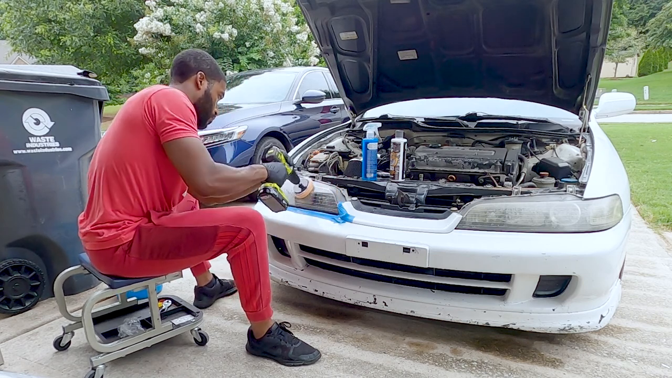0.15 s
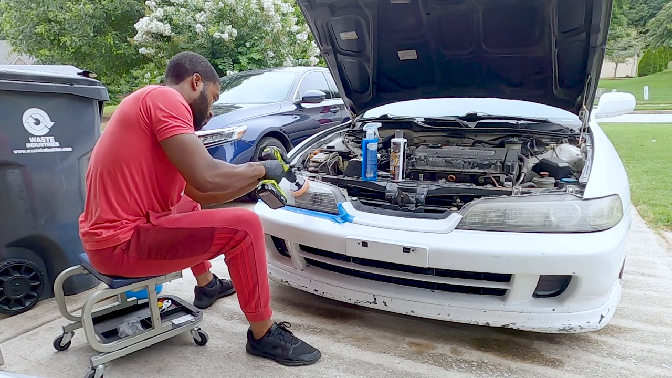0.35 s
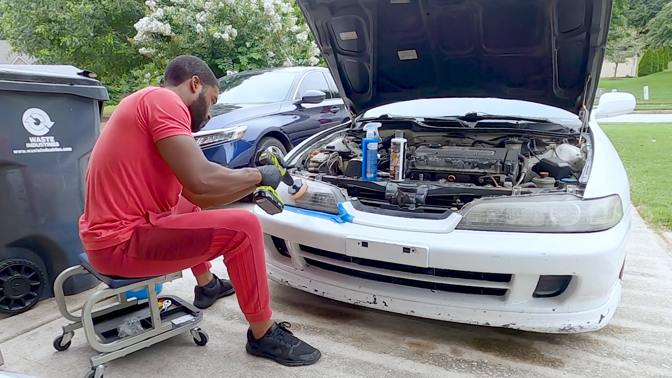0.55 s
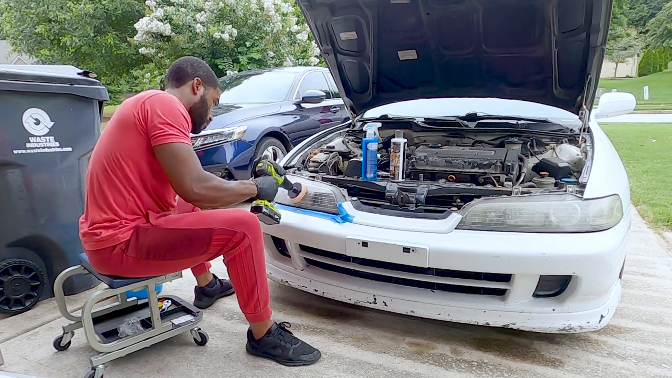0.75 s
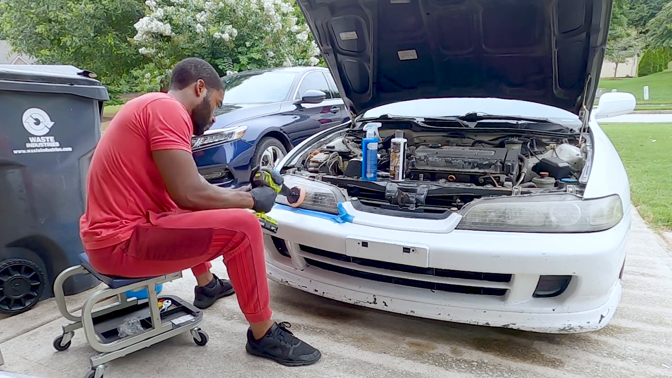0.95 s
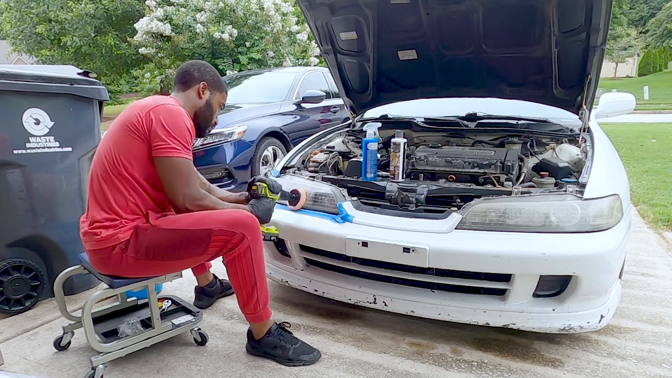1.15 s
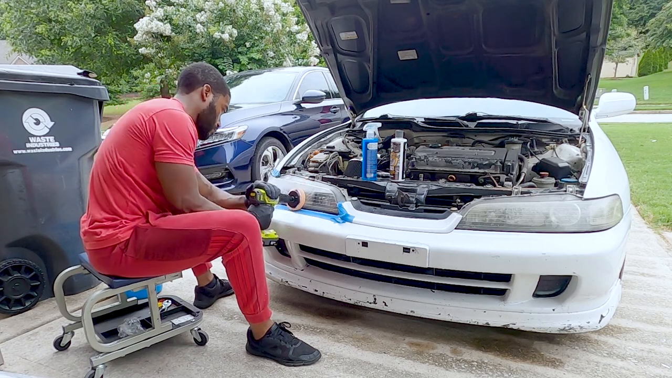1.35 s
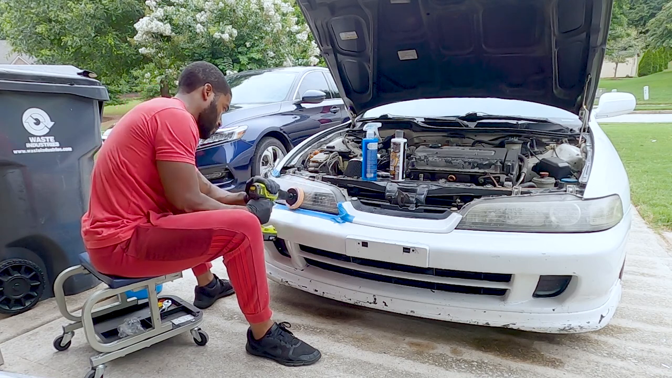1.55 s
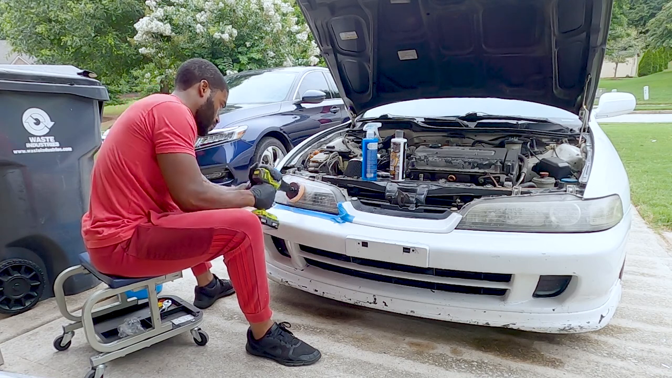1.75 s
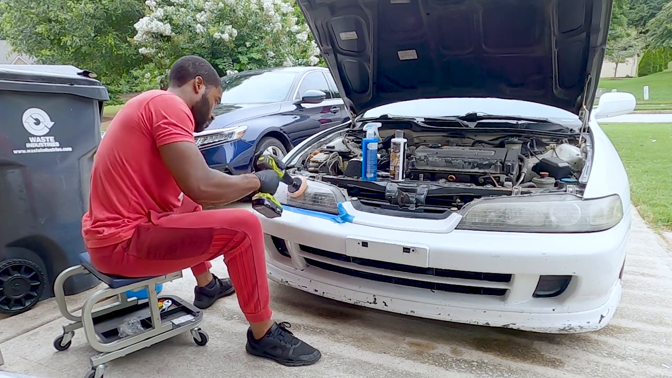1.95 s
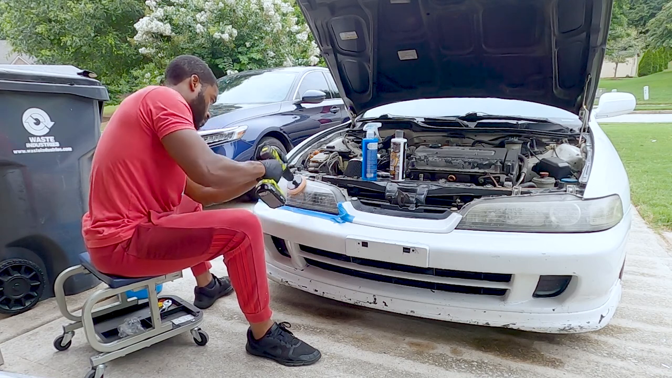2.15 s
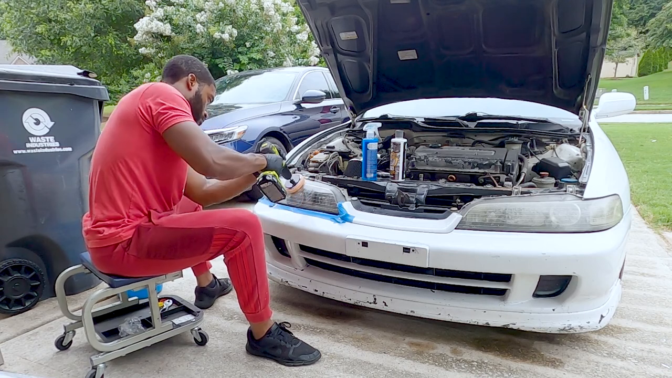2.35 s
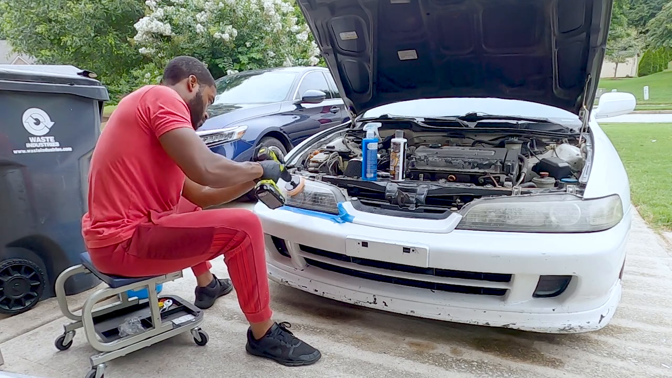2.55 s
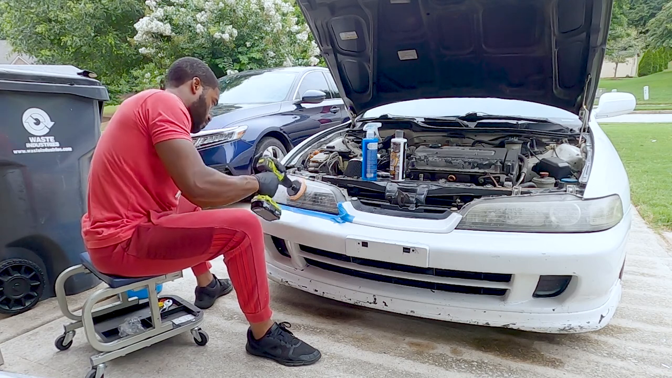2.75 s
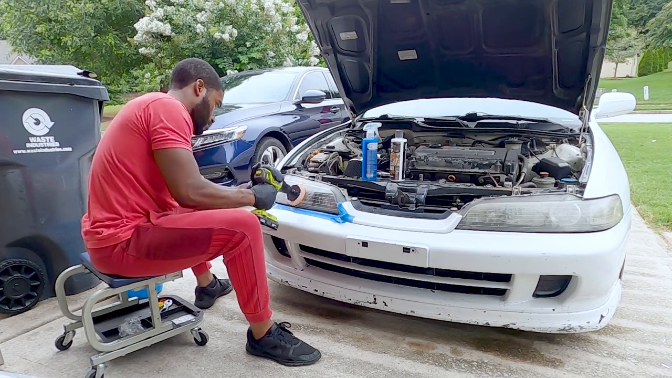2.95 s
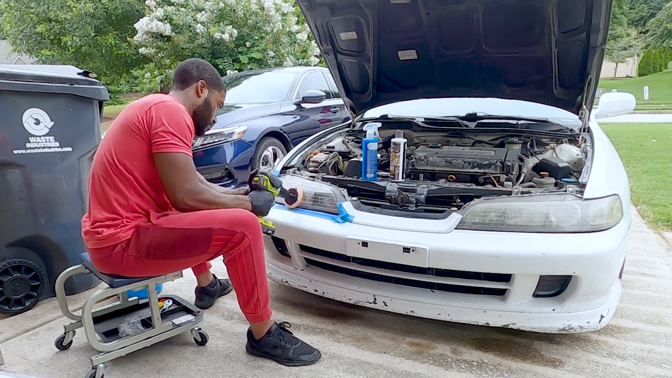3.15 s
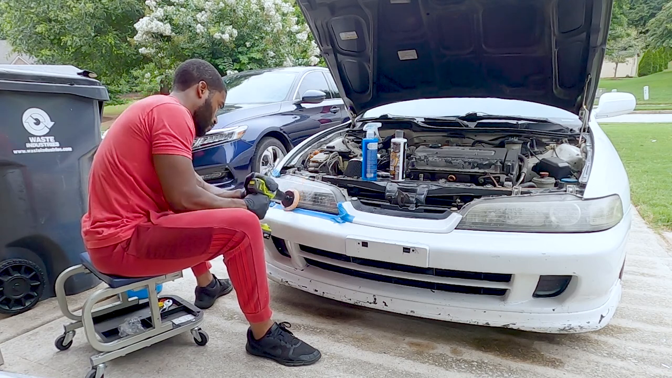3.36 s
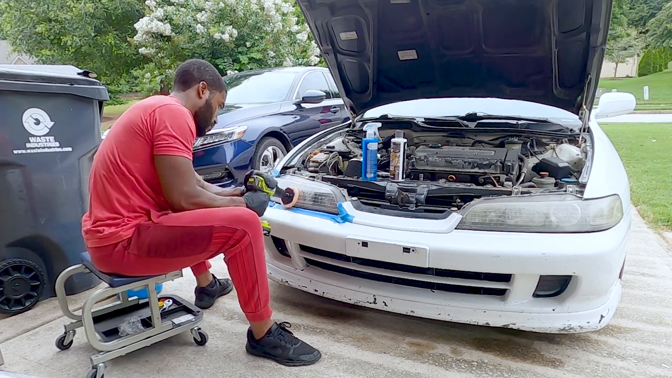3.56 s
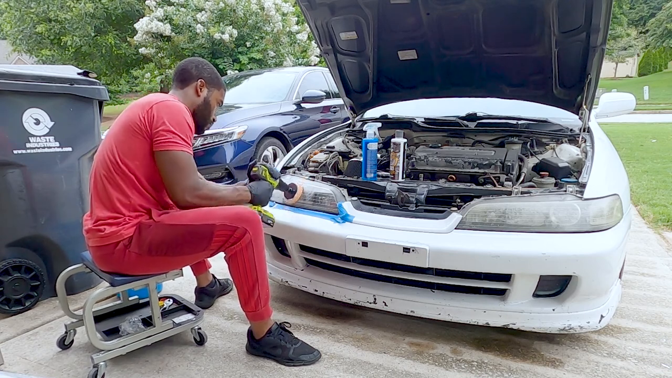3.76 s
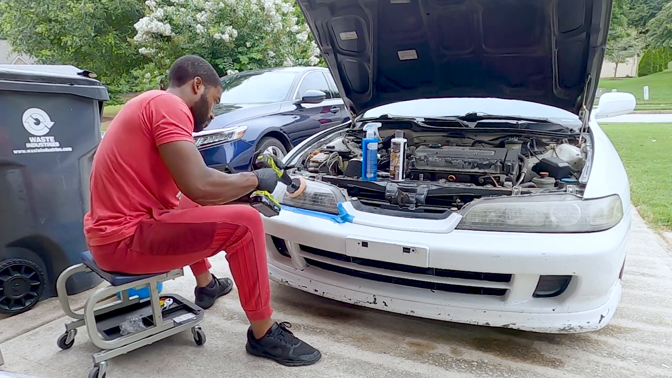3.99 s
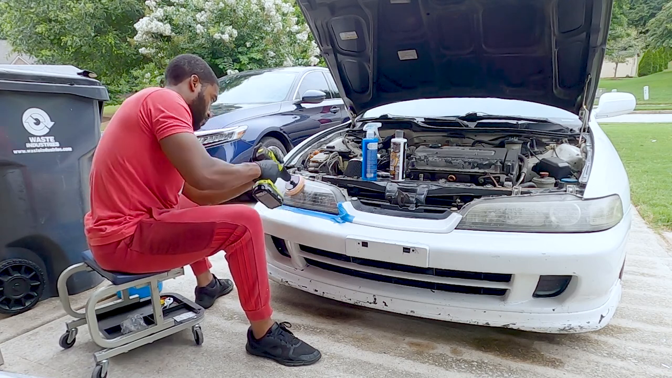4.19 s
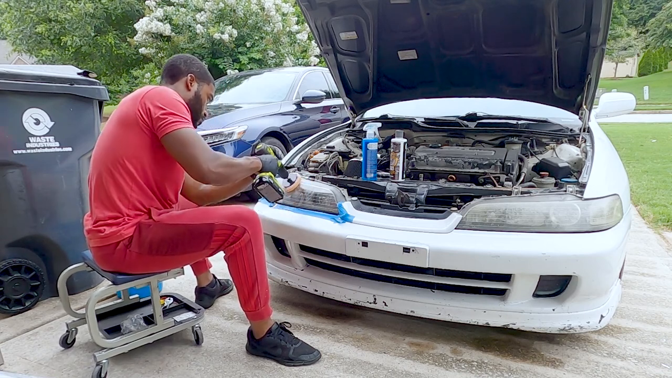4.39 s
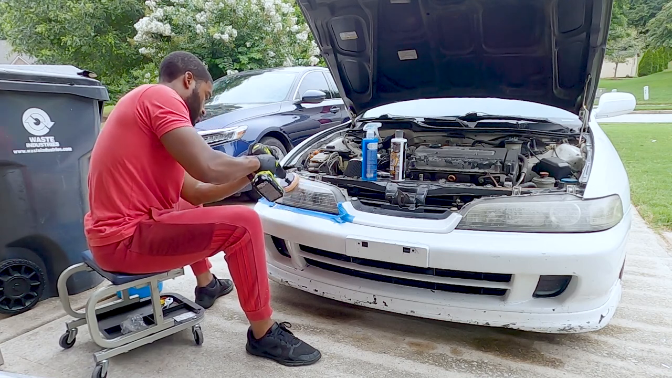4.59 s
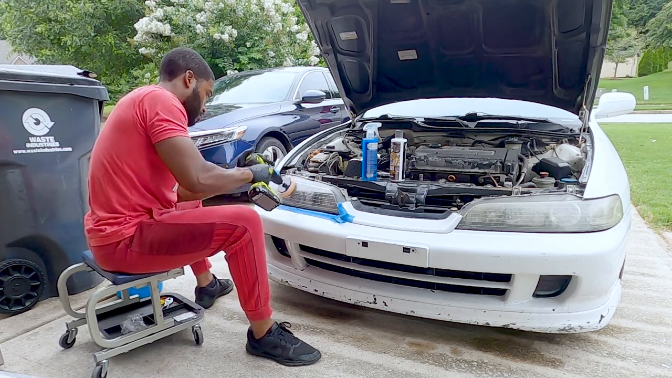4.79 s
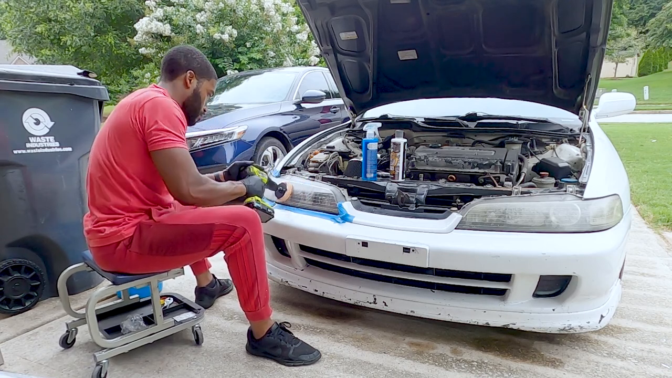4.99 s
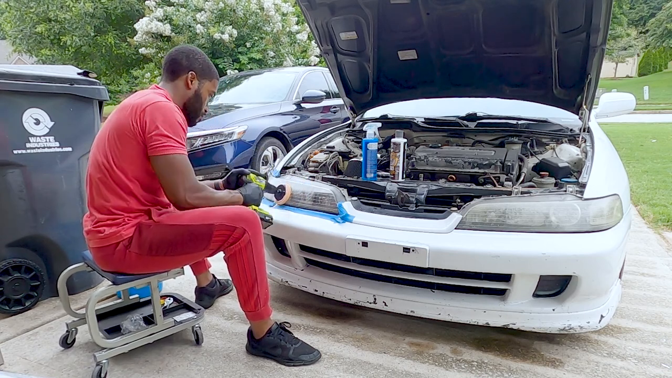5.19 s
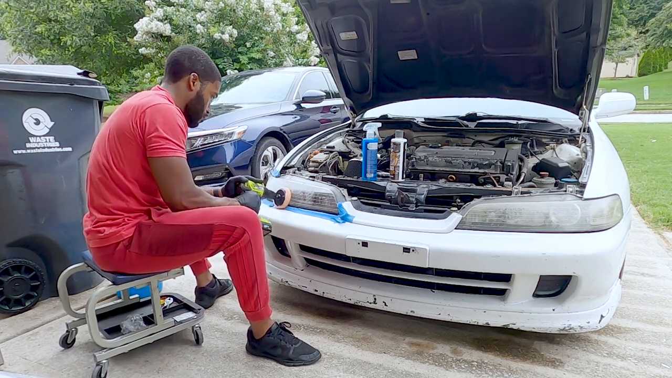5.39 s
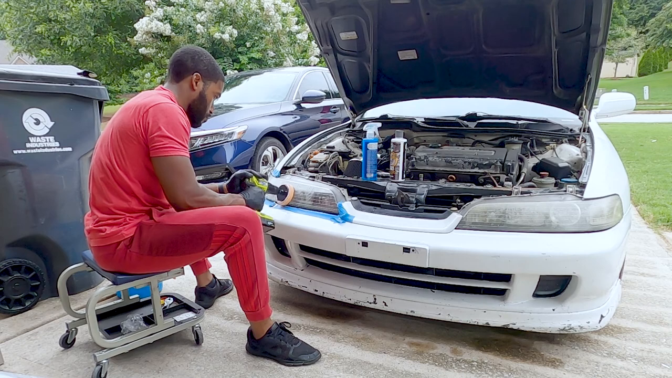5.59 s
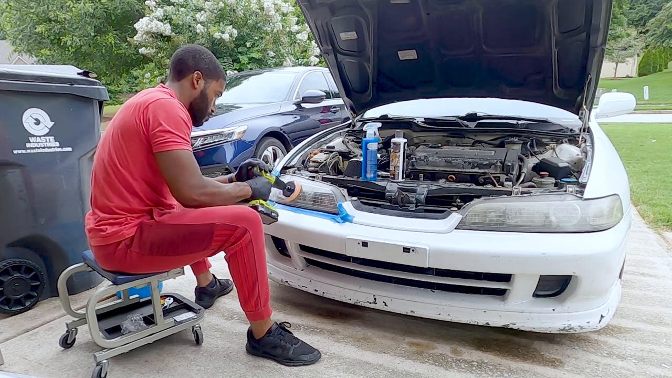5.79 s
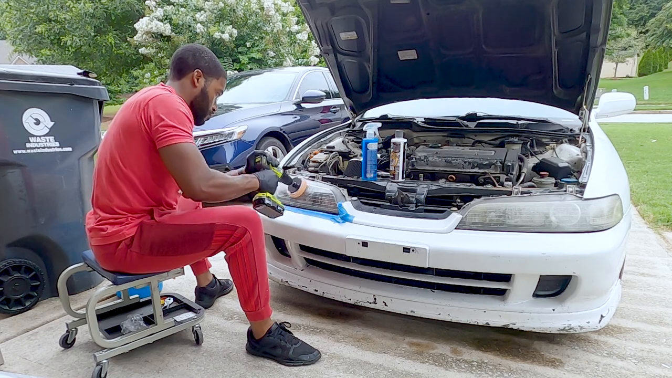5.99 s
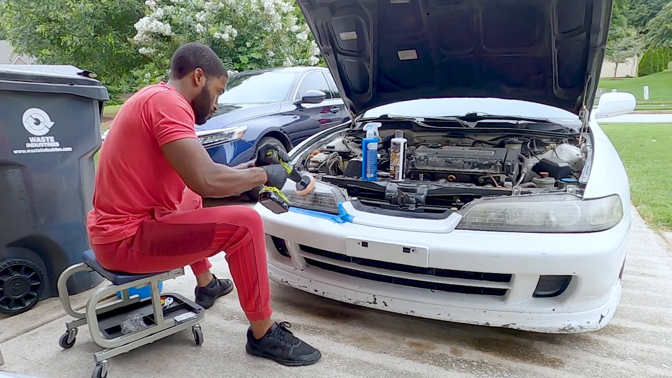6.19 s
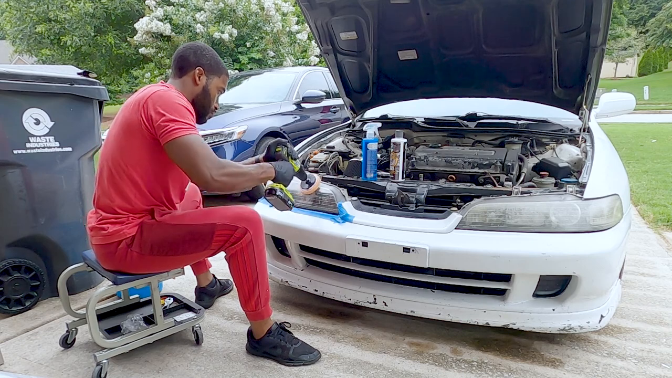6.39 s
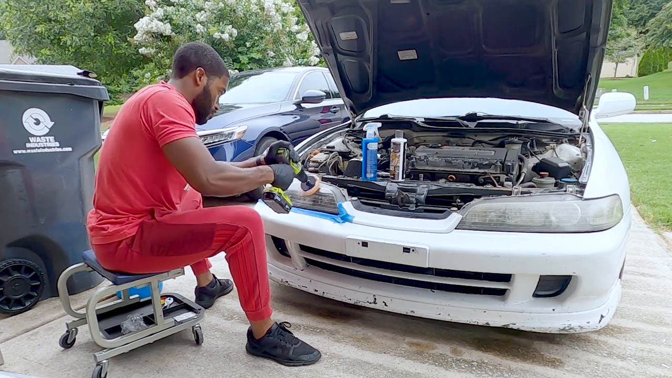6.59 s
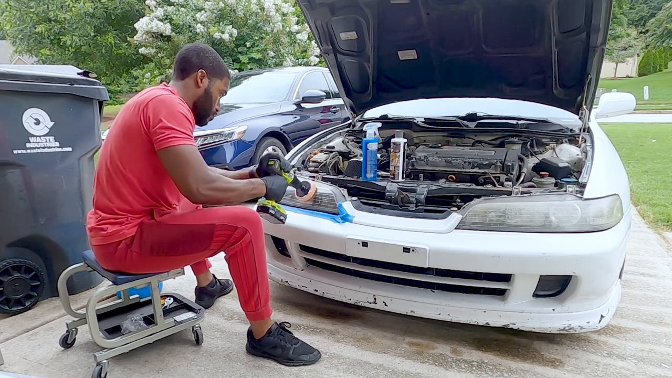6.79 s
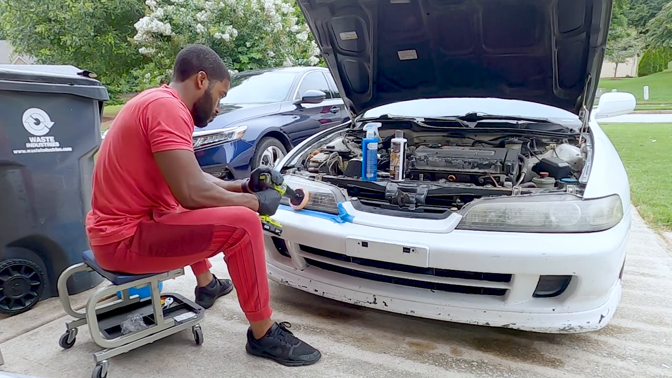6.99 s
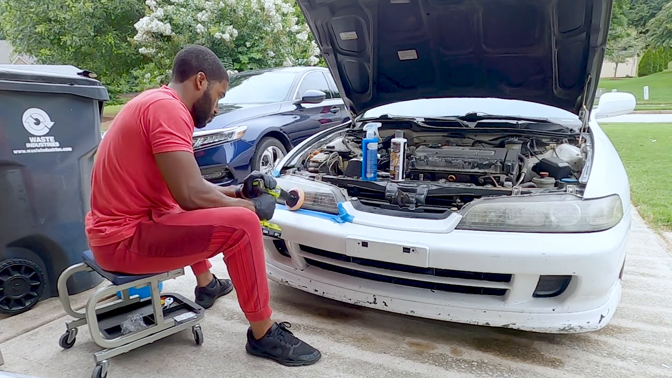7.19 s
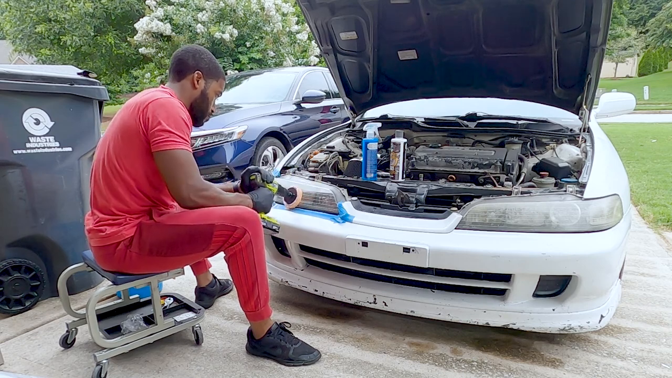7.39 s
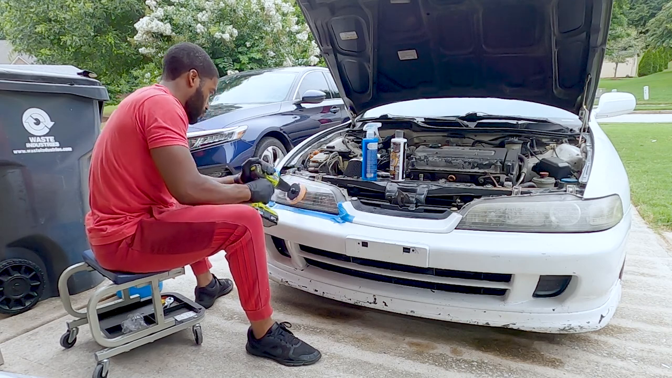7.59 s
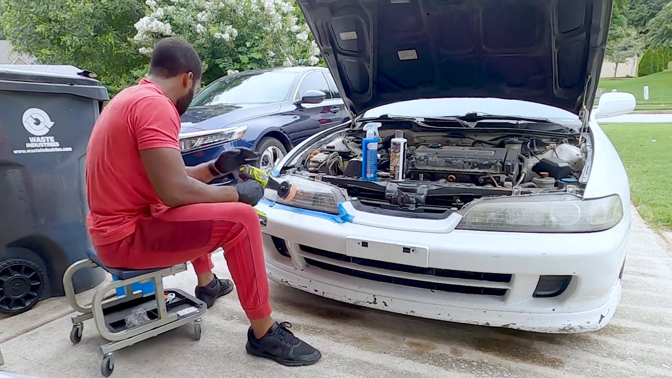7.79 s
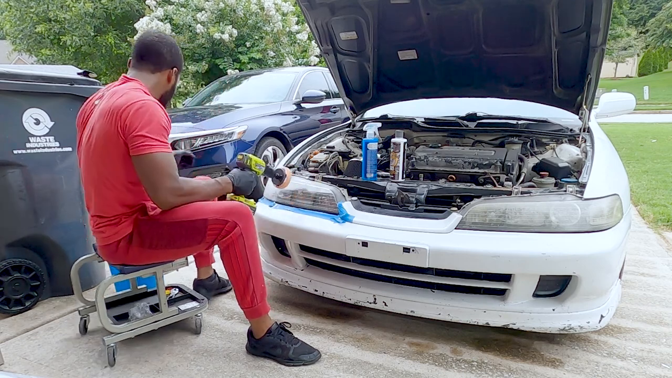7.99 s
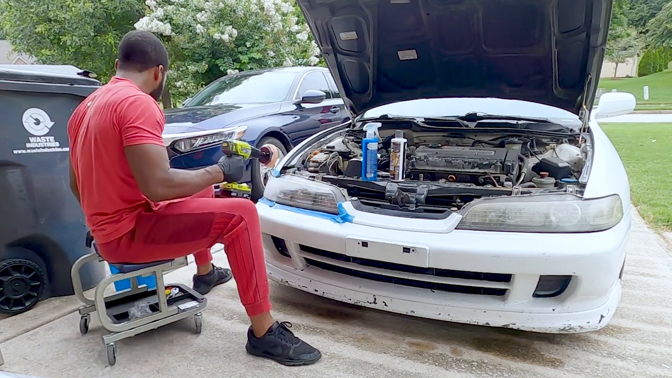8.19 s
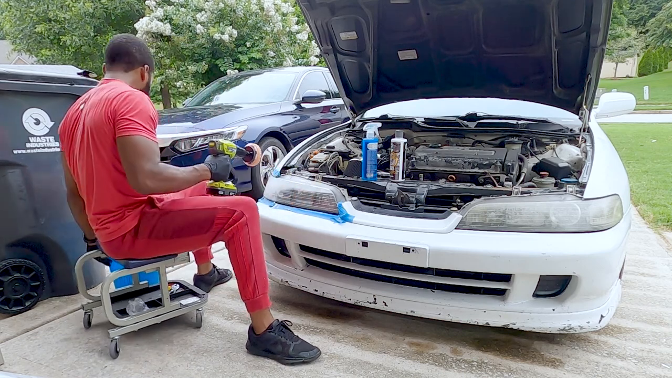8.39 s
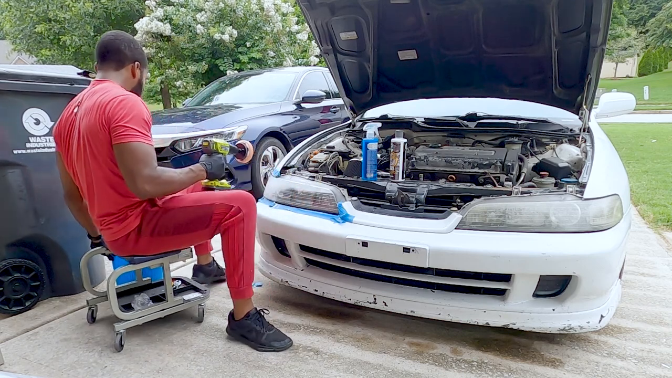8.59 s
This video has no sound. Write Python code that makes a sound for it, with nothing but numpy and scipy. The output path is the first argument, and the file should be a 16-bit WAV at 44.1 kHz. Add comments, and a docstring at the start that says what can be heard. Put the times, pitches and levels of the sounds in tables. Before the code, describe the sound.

A continuous electric drill dominates, near the microphone: dense gear rasp, steady high whine, vent hiss and the hum of a rubbing foam pad, with small shifts as pressure changes. Thin squeals come and go. The trigger is released and the noise brakes dead. In the remaining second, hard casters crunch in bursts over concrete, rattling, with a dull metallic knock, above faint far traffic in open air.

```python
"""Drill polishing a headlight

A cordless drill spins a foam pad on a car's plastic headlight lens, on a driveway. Shaft-locked sines make the
motor and gear whine, coloured noise the rasp and vent air, moving narrow noise bands the pad's hum and squeals.
The trigger is let go and the drill brakes at once. The worker then rolls his wheeled stool back over concrete:
gritty noise bursts, caster rattles and one ringing knock. Distant traffic, noise and a sine, rumbles throughout."""
import sys
import numpy as np
from scipy import signal
from scipy.fft import rfft, irfft, next_fast_len
from scipy.io import wavfile

SR = 44100
rng = np.random.default_rng(int(sys.argv[2]) if len(sys.argv) > 2 else 0)


def persist_wave(psi):
    """Save psi, clipped to +-1, as 16-bit WAV."""
    counts = np.round(np.clip(psi, -1, 1) * 32767).astype(np.int16)
    wavfile.write(sys.argv[1], SR, np.atleast_2d(counts).T)


N = 381465


def amp(db):
    """Decibels to gain."""
    return 10 ** (np.asarray(db) / 20)


def unit(x):
    """Scale to rms 1."""
    return x / np.sqrt(np.mean(x ** 2) + 1e-20)


def along(points, hz):
    """Read (f/Hz, value) points on a log frequency axis."""
    f, v = np.transpose(points)
    return np.interp(np.log(hz + 1), np.log(f), v)


def clock():
    """The time of every sample in seconds."""
    return np.arange(N) / SR


def curves(rows):
    """One value per sample for each column after the time."""
    s, *columns = np.transpose(rows)
    return [np.interp(clock(), s, column) for column in columns]


def wobble(rate):
    """A smooth random curve, rate knots a second."""
    knots = rng.standard_normal(int(N * rate / SR) + 4)
    fine = signal.resample_poly(knots, 10, 1)
    return np.interp(clock() * rate * 10, np.arange(len(fine)), fine)


def filtered(x, response):
    """Multiply the spectrum of x by a response of frequency."""
    size = next_fast_len(N + 8192)
    hz = np.fft.rfftfreq(size, 1 / SR)
    return irfft(rfft(x, size) * response(hz), size)[..., :N]


def white():
    """Two unrelated noises."""
    return rng.standard_normal((2, N))


def grains(rate, scatter_db):
    """Tiny impacts of uneven size at random times, rate a second."""
    sizes = amp(scatter_db * np.clip(rng.standard_normal(N), -2, 2))
    struck = rng.random(N) < rate / SR
    return unit(white() * sizes * struck)


def narrow(hz, width_hz, order=2):
    """Noise of rms 1 in a resonance whose centre may move: slow noise shifted up onto a carrier."""
    sway = filtered(white(), lambda f: 1 / np.sqrt(1 + (2 * f / width_hz) ** (2 * order)))
    phase = 2 * np.pi * np.cumsum(hz * np.ones(N)) / SR
    return unit(sway[0] * np.cos(phase) + sway[1] * np.sin(phase))


# how alike left and right are: (f/Hz, likeness from 0 to 1)
EAR_LIKENESS = [(60, 1), (240, 0.9), (500, 0.91), (1000, 0.8), (2000, 0.7), (4000, 0.64), (8000, 0.47),
                (13000, 0.43)]


def spread(pair, colour_db):
    """Turn two unrelated signals into coloured left and right, alike in the bass and less so in the treble."""
    def response(hz):
        turn = np.arccos(np.clip(along(EAR_LIKENESS, hz), -1, 1)) / 2
        return amp(colour_db(hz)) * [np.cos(turn), np.sin(turn)]

    mid, side = filtered(pair, response)
    return np.array([mid + side, mid - side]) / np.std(mid)


# bonnet, wing, driveway and bin throw the sound back: (mean delay/s, level/dB)
ECHOES = [(.0013, -21), (.0031, -18), (.0058, -17), (.0093, -16), (.0142, -16)]


def surfaces(x):
    """Echoes with slowly drifting delays comb the noise into shifting stripes; the sum has rms 1."""
    fine = signal.resample_poly(x, 2, 1, axis=1)  # doubled rate, for delays between samples
    fine_t = np.arange(2 * N) / (2 * SR)
    total = x
    for delay, db in ECHOES:
        when = clock() - delay + .00013 * wobble(1.5)
        total = total + amp(db) * np.array([np.interp(when, fine_t, ear) for ear in fine])
    return unit(total)


# distant traffic, before the trims in traffic(): (t/s, rumble level/dB, engine drone level/dB)
TRAFFIC_LEVELS = [(0, -42, -38.5), (1, -44.5, -41), (1.35, -43.5, -46), (2.6, -46.5, -39),
                  (2.9, -45.5, -49), (5.45, -47, -52.5), (5.85, -48, -40), (7.5, -47, -41.5),
                  (8.4, -42, -41), (8.65, -48, -50)]
# relative colour of the road rumble: (f/Hz, level/dB per Hz)
RUMBLE_COLOUR = [(12, -25), (28, -2.5), (40, -1.5), (58, 2.5), (78, -3.5), (93, 3), (105, -2.5), (140, -4),
                 (170, -10), (200, -9.5), (280, -20.5), (500, -17.5), (2000, -14.5), (12000, -31),
                 (15500, -54)]


def traffic():
    """Far road rumble as low noise, with an engine drone whose firing rate and level waver."""
    rumble_db, drone_db = curves(TRAFFIC_LEVELS)
    rumble = amp(rumble_db + 5) * spread(white(), lambda hz: along(RUMBLE_COLOUR, hz))
    firing_hz = 66 + 1.2 * wobble(6)
    firing = 2 * np.pi * np.cumsum(firing_hz) / SR
    drone = amp(drone_db - 1.5 + 1.5 * wobble(8.6)) * np.sqrt(2) * np.sin(firing)
    return rumble + drone


# shoves that set the stool rolling: (start t/s, length/s, grit level/dB, frame rumble level/dB)
SHOVES = [(7.827, .03, -35, -55), (7.896, 0.035, -36, -56), (7.958, 0.034, -37, -44),
          (7.994, 0.13, -31, -40.5), (8.29, 0.24, -32, -54), (8.571, .1, -27.5, -40)]
SHOVE_ATTACK_S, SHOVE_RELEASE_S = .022, .27  # rise; time to fall 60 dB once stopped, on top of the slowing
SLOWING_DB_PER_S = 14  # the wheels lose speed after each shove


def rolling():
    """How fast the stool rolls, as gains of grit and frame: each shove rises quickly, slows and is stopped."""
    grit = frame = 0
    for start, length, grit_db, frame_db in SHOVES:
        t = np.maximum(clock() - start, 0)
        rise = np.minimum(t / SHOVE_ATTACK_S, 1)
        stopping_db = -60 * np.maximum(t - length, 0) / SHOVE_RELEASE_S
        motion = rise * amp(-SLOWING_DB_PER_S * t + stopping_db)
        grit = grit + amp(grit_db) * motion
        frame = frame + amp(frame_db) * motion
    return grit, frame


# relative colours of the wheel grit and of the shaken frame: (f/Hz, level/dB per Hz)
GRIT_COLOUR = [(500, -37), (800, -15), (950, -7.5), (1150, -8), (1550, -4), (2100, -6.5), (2750, -5),
               (3900, -11.5), (5200, -14.5), (7900, -21), (9200, -10), (10500, -25), (13000, -30),
               (15500, -37)]
FRAME_COLOUR = [(150, -12), (260, -7), (350, -7), (430, 4), (560, -0.5), (700, -5), (950, 1), (1600, -35)]


def casters():
    """Hard wheels crunch over grit and shake the stool's frame, with fast uneven jolts."""
    grit_gain, frame_gain = rolling()
    jolts = unit(amp(1.3 * wobble(70)))
    crunch = unit(white() + grains(rate=1500, scatter_db=0.0))
    grit = grit_gain * surfaces(spread(crunch, lambda hz: along(GRIT_COLOUR, hz)))
    frame = frame_gain * surfaces(spread(white(), lambda hz: along(FRAME_COLOUR, hz)))
    return jolts * (grit + frame)


# casters catch on bumps and rattle: (t/s, level/dB, centre f/Hz, fall-off/dB per octave, t60/s)
BUMPS = [(7.822, -34, 2400, 1, 0.11), (7.914, -36, 2700, -2, 0.079), (8.016, -26.5, 1600, 18, 0.11),
         (8.191, -25, 1500, 7.5, 0.084), (8.251, -30, 5500, 1.5, 0.11), (8.322, -28, 1400, 11, 0.06),
         (8.393, -28.5, 3700, 30, .09), (8.532, -29.5, 3750, 7, 0.14), (8.627, -22.5, 2800, 20, 0.11)]


def bumps(attack):
    """Caster swivels rattle: short decaying noises, most of them brightest around their own pitch; attack in s."""
    out = np.zeros((2, N + SR))
    t = np.arange(SR // 10) / SR
    hz = np.fft.rfftfreq(len(t), 1 / SR) + 1
    for s, db, centre, slope_db, t60 in BUMPS:
        colour = amp(-slope_db * np.abs(np.log2(hz / centre))) / (1 + (hz / 10000) ** 6)
        mid, side = irfft(rfft(rng.standard_normal((2, len(t)))) * colour, len(t))
        rattle = unit(np.array([mid + 0.36 * side, mid - 0.32 * side]))
        envelope = amp(db - 60 * t / t60) * (1 - np.exp(-t / attack))
        start = round(s * SR)
        out[:, start:start + len(t)] += envelope * rattle
    return out[:, :N]


# the stool's frame knocks once: (t/s, level/dB)
KNOCK = (8.274, -27.5)
# ringing modes of the frame: (f/Hz, level/dB relative to the knock, t60/s)
FRAME_MODES = [(202, -3, .12), (380, -0.5, 0.046), (680, -11, .05), (986, 3.5, 0.067), (1080, -2, .09),
               (1220, -1, .04), (1410, -12, .035)]


def knock():
    """One dull blow rings the stool's frame as a set of decaying sines."""
    s, db = KNOCK
    t = np.maximum(clock() - s, 0)
    ring = 0
    for hz, level, t60 in FRAME_MODES:
        decay_db = -60 * np.minimum(t / t60, 10)
        ring = ring + amp(db + level + decay_db) * np.sin(2 * np.pi * hz * t)
    return ring


# the pad's hum on the hollow lens: (t/s, resonance f/Hz, level/dB)
PAD_RUB = [(0, 1280, -43.5), (1.15, 1400, -38), (1.6, 1420, -35), (2.6, 1300, -49), (3.3, 1420, -37),
           (3.9, 1420, -37.5), (4.75, 1330, -57), (5.15, 1350, -35.5), (5.6, 1320, -41), (6, 1190, -34.5),
           (6.5, 1080, -35), (7.25, 1200, -35.5), (7.7, 1190, -36)]
# the drying pad sings on the lens: (middle t/s, length/s, f/Hz, peak level/dB)
SQUEALS = [(2.75, 0.63, 4500, -34), (5.5, 2.5, 4870, -33), (6.05, 1.2, 4520, -30), (5.4, 0.91, 10000, -40),
           (7.6, 0.6, 4500, -31.5)]


def pad():
    """Foam drags over the lens and stirs a resonance that shifts with the spot polished; at times it sings."""
    hz, db = curves(PAD_RUB)
    sound = amp(db + 1.9 * wobble(20)) * narrow(hz, width_hz=230)
    for middle, length, pitch, level in SQUEALS:
        swell = np.cos(np.pi * np.clip((clock() - middle) / length, -.5, .5))
        sound = sound + amp(level) * swell * narrow(pitch, width_hz=98)
    return sound


# resonances and a hollow in the drill's noise: (f/Hz, width/Hz, level/dB)
HOUSING_MODES = [(1014, 41, 7), (1208, 78, 8), (1513, 62, 4.5), (1546, 39, -8), (1720, 31, 1.5),
                 (4420, 170, 1.5), (4850, 170, 3), (14700, 350, 9)]


def housing_db(hz):
    """Lift or dip from the resonances around the drill, summed in dB."""
    return sum(db / (1 + (2 * (hz - centre) / width) ** 2) for centre, width, db in HOUSING_MODES)


# the hand rocks the drill, then holds it steadier: (first crest t/s, strokes per s, settles from t/s, settled t/s)
ROCKING = (.235, 1.985, 4.4, 4.9)


def strokes():
    """The to and fro of the hand, a cosine from -1 to 1 that fades to rest."""
    first, rate, settles, settled = ROCKING
    t = clock()
    return np.cos(2 * np.pi * rate * (t - first)) * np.interp(t, [settles, settled], [1, 0])


# gear mesh, motor slots and cooling fan: (multiples of the motor speed)
WHINE_ORDERS = [10.22, 12, 25]
# gear mesh whine, rising and falling as the hand presses harder or eases: (t/s, level/dB)
MESH_LEVEL = [(0, -34), (.5, -30.5), (.7, -41), (1.05, -32.5), (1.65, -30), (2.15, -33.5), (2.45, -50),
              (3.2, -31), (4.1, -32), (4.58, -54), (4.84, -27), (5.1, -33), (5.4, -27), (6.2, -38),
              (7.3, -32), (7.7, -35)]
# whine of the motor slots, before the swing of the strokes: (t/s, level/dB)
SLOTS_LEVEL = [(0, -38.5), (1.5, -51), (2.75, -36), (3.9, -44), (4.55, -27), (5, -38), (5.7, -33),
               (6, -35.5), (7.7, -36)]
# whine of the cooling fan, before the swing of the strokes: (t/s, level/dB)
FAN_LEVEL = [(0, -50), (1.6, -40.5), (4.3, -40), (4.65, -47), (5.3, -42), (6.5, -50), (6.8, -34),
             (7.7, -36.5)]
SLOTS_SWING_DB, FAN_SWING_DB = 4.5, 6  # each stroke turns the vents towards the listener and away
# the motor's unbalance hum, once a turn, before its waver: (t/s, level/dB)
HUM_LEVEL = [(0, -52), (.4, -48), (1.45, -48), (1.9, -52), (2.8, -47.5), (3.9, -50.5), (5.35, -49),
             (5.95, -53), (7.7, -53)]
# weaker motor and gearbox tones, before the trim tones_db: (multiple of the motor speed, level/dB)
WEAK_TONES = [(2, -56.5), (4, -46), (5, -44), (7, -59), (9, -43.5), (9.5, -42.5), (10, -39), (11, -44),
              (13, -39.5), (14, -41.5), (19, -58), (20, -55), (23, -66), (24, -43), (26, -57), (28, -58),
              (29, -60), (30, -55), (35, -62)]


def whine(angle, fade_db, blur, tones_db):
    """Sines locked to the shaft; each fades by itself, partly apart at either ear, as the drill moves."""
    def tone(order):
        shared = 0.75 * wobble(11) + 0.95 * wobble(45)
        # play in the shaft blurs the high tones
        phase = order * angle + blur * min(order / 10, 1.3) * wobble(110)
        shift = min(order / 25, 1) * .25 * wobble(5)
        ears = []
        for sign in (1, -1):
            fade = unit(amp(fade_db * (shared + 0.38 * wobble(6))))
            ears.append(fade * np.sqrt(2) * np.sin(phase + sign * shift))
        return np.array(ears)

    stroke = strokes()
    mesh_db = curves(MESH_LEVEL)[0]
    slots_db = curves(SLOTS_LEVEL)[0] + SLOTS_SWING_DB * stroke
    fan_db = curves(FAN_LEVEL)[0] + FAN_SWING_DB * stroke
    loud = sum(amp(db) * tone(order) for order, db in zip(WHINE_ORDERS, (mesh_db, slots_db, fan_db)))
    hum = amp(curves(HUM_LEVEL)[0] + 1.4 * wobble(9.1)) * np.sqrt(2) * np.sin(angle)
    weak = sum(amp(db + tones_db) * tone(order) for order, db in WEAK_TONES)
    return hum + loud + weak


# motor speed sagging under hand pressure, before flutter and braking: (t/s, turns per s)
MOTOR_SPEED = [(0, 349.6), (.52, 349.6), (.68, 346.2), (1.4, 345.3), (1.64, 348.4), (2.6, 347.7),
               (3.35, 346.3), (3.48, 344.3), (4.12, 349.2), (4.81, 345.5), (5.46, 344.4), (5.7, 348.3),
               (6.28, 347.7), (6.82, 348.6), (7.11, 347.7), (7.26, 345.4), (7.52, 348), (7.71, 347.3)]
# noise of the running drill: (t/s, gear rasp level/dB, vent air level/dB)
RUN_LEVELS = [(0, -22.5, -32), (3.6, -22.5, -32.5), (4.55, -22.5, -33), (4.95, -20.5, -31.5),
              (5.4, -21.5, -30.5), (6.3, -23, -33.5), (7, -22, -33), (7.7, -23, -33)]
# relative colours of the gear rasp and vent air: (f/Hz, level/dB per Hz)
RASP_COLOUR = [(250, -24), (480, -24), (700, -14.5), (900, -16.5), (1050, -11), (1600, -6.5), (2350, -6),
               (2850, -1), (3600, 0.5), (4850, -1.5), (5400, -5), (6400, -12), (8000, -22), (12000, -46)]
AIR_COLOUR = [(4500, -25.5), (6500, -11), (7700, -4.5), (8500, -0.5), (9200, 1.5), (10000, -5),
              (10900, -13), (12000, -12.5), (13200, -16), (15000, -20), (15800, -36)]
BRAKE_S = 7.718  # the trigger is let go


def drill():
    """Motor tones, gear-tooth rasp, vent air pulsing once a turn, and the rubbing pad, all ended by the brake."""
    braking = np.maximum(clock() - BRAKE_S, 0)
    flutter = 1 + .0016 * wobble(9) + .0007 * wobble(40)
    speed = curves(MOTOR_SPEED)[0] * flutter * np.exp(-braking / .25)
    angle = 2 * np.pi * np.cumsum(speed) / SR
    rasp_db, air_db = curves(RUN_LEVELS)

    teeth = unit(white() + .5 * grains(rate=3500, scatter_db=1.5))
    gears = surfaces(spread(teeth, lambda hz: along(RASP_COLOUR, hz) + housing_db(hz)))
    rasp = amp(rasp_db + 0.43 * wobble(30)) * gears

    puffs = unit(1 + .14 * np.sin(angle))
    vents = surfaces(spread(white(), lambda hz: along(AIR_COLOUR, hz) + housing_db(hz)))
    air = amp(air_db + 0.79 * wobble(25)) * puffs * vents

    tones = whine(angle, fade_db=1.7, blur=0.4, tones_db=-1.0)
    # the tones die with the current, the noise a moment later: 60 dB in .04 s and .22 s
    driven = amp(-60 * braking / .04)
    coasting = amp(-60 * braking / 0.22)
    return tones * driven + (rasp + air + pad()) * coasting


# lean of each band to one side: (f/Hz, left minus right level/dB)
SIDE_LEAN = [(100, 0.7), (1500, 0.5), (2900, 2.5), (4800, 0), (6300, 0), (7700, -1.5), (8500, -1.5),
             (9200, 4.5), (10200, 1.5), (12000, -3.5), (14700, -4)]


def scene():
    """Traffic, stool and drill; the right ear hears a little sooner and bands lean to one side."""
    stool = casters() + bumps(attack=.001) + knock()
    ears = np.array([[1], [-1]]) / 2
    lag = .000016  # s, left behind right

    def placing(hz):
        return amp(ears * along(SIDE_LEAN, hz)) * np.exp(-2j * np.pi * hz * ears * lag)

    return filtered(traffic() + stool + drill(), placing)


TOP_HZ = 15750


def record(dry):
    """A steep band limit: nothing passes from TOP_HZ upwards."""
    return filtered(dry, lambda hz: hz < TOP_HZ)


dry = scene()
out = record(dry)
persist_wave(out)
```